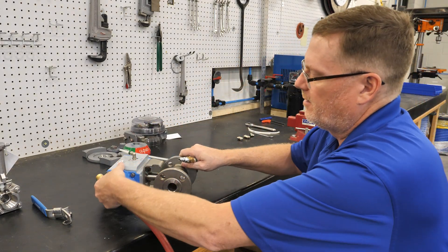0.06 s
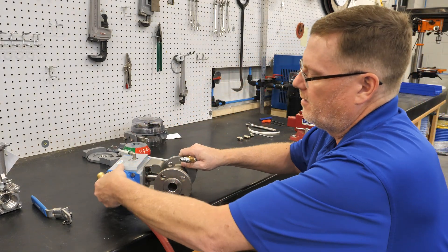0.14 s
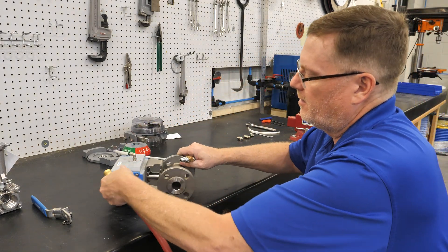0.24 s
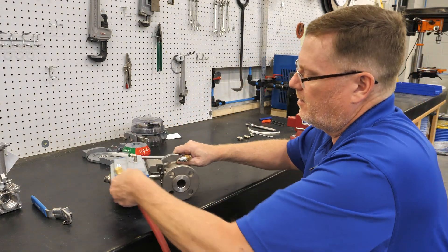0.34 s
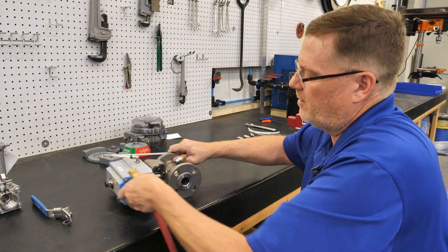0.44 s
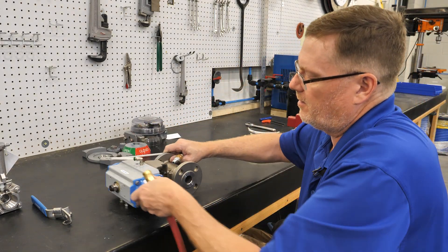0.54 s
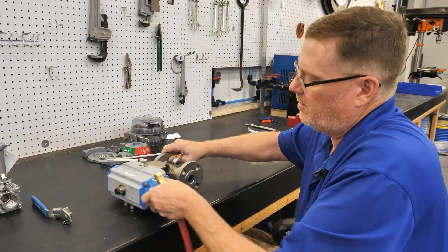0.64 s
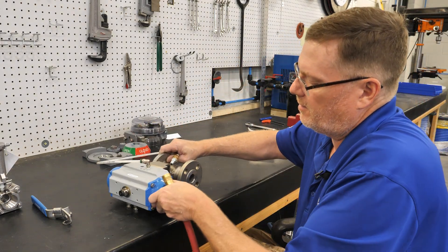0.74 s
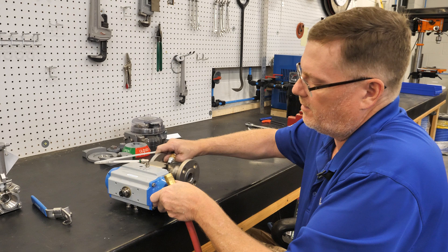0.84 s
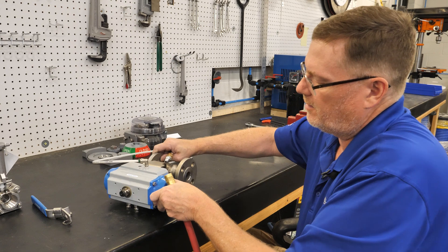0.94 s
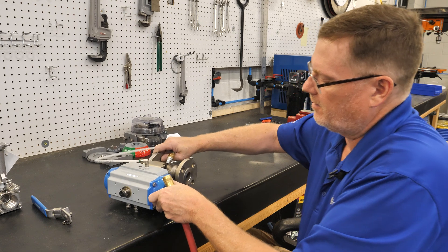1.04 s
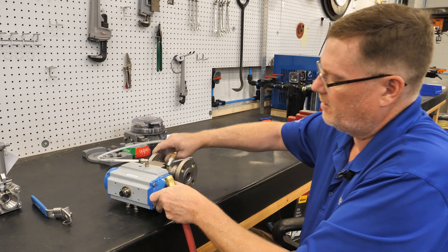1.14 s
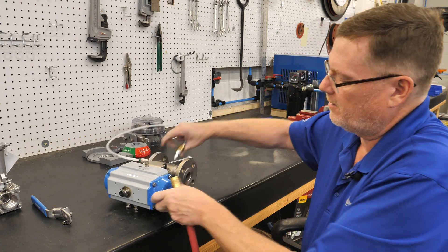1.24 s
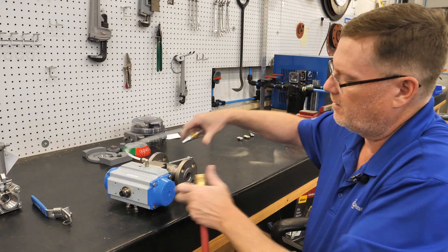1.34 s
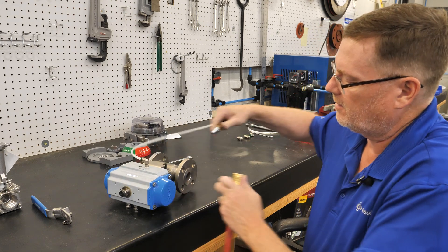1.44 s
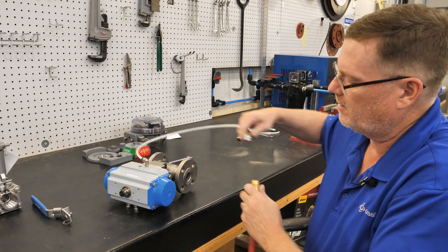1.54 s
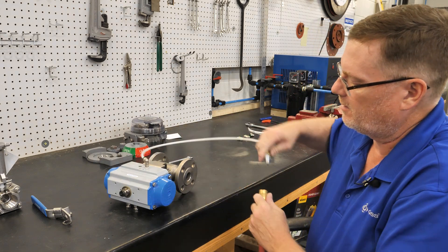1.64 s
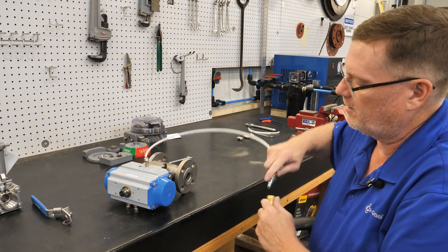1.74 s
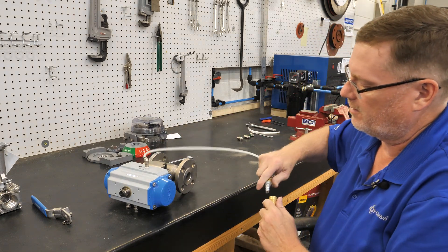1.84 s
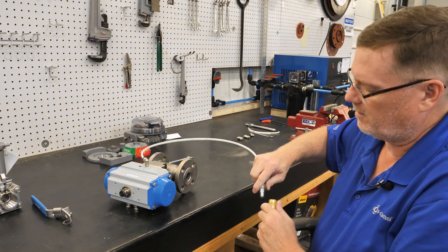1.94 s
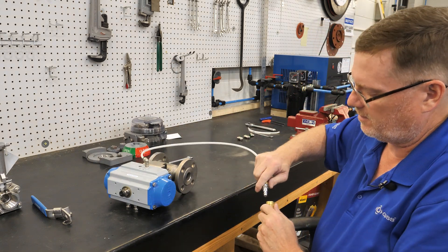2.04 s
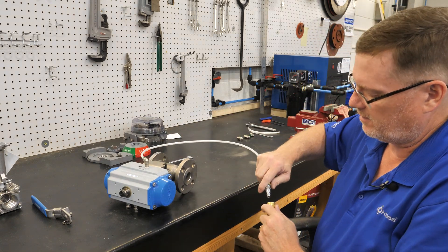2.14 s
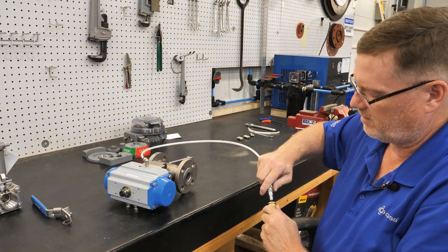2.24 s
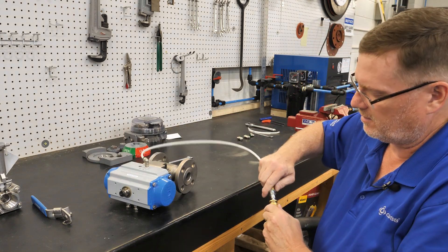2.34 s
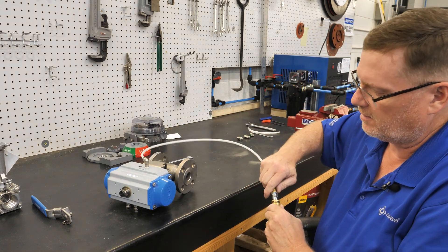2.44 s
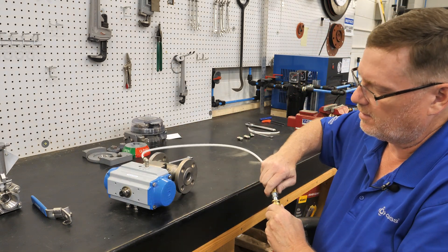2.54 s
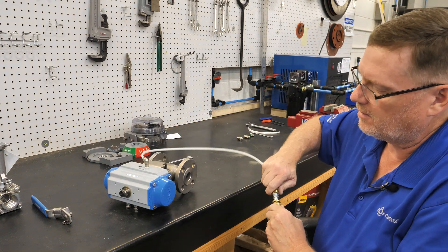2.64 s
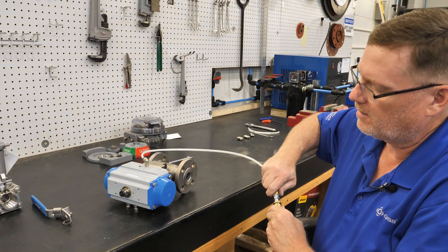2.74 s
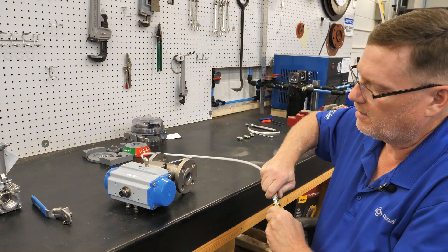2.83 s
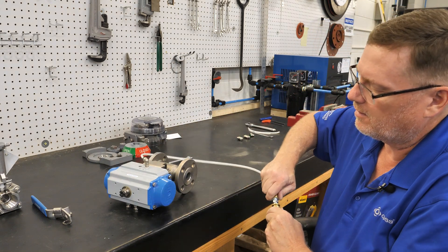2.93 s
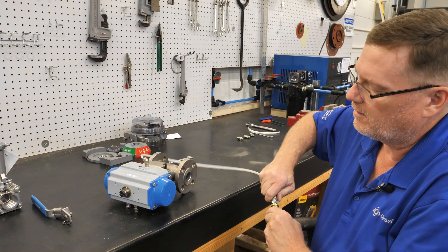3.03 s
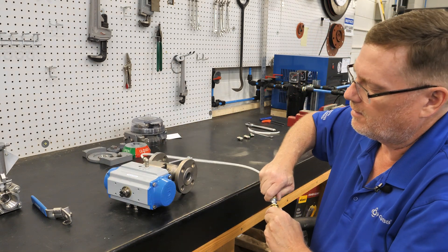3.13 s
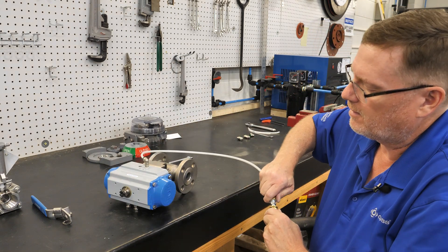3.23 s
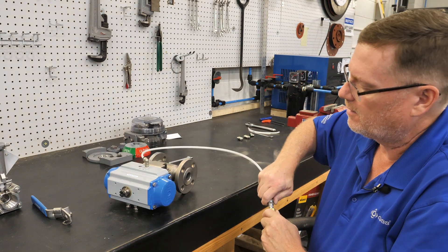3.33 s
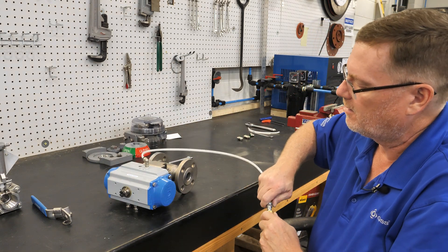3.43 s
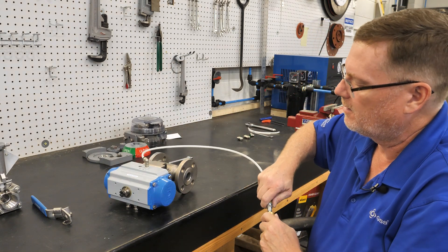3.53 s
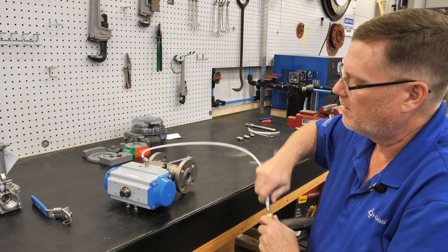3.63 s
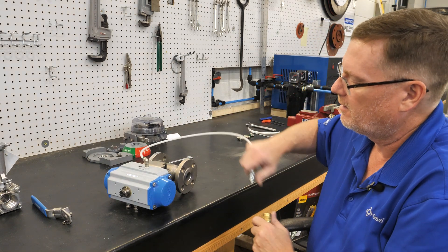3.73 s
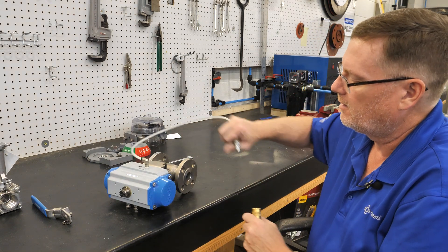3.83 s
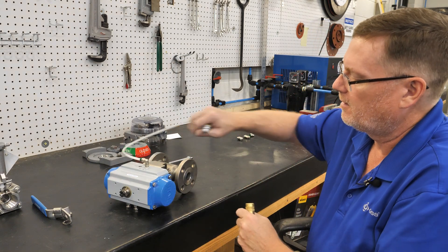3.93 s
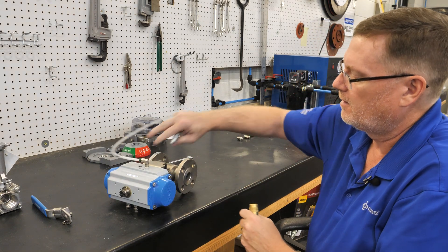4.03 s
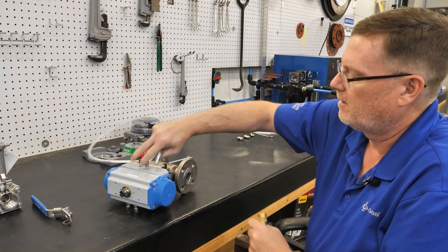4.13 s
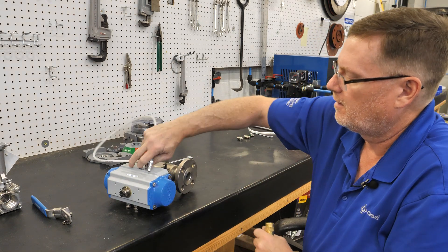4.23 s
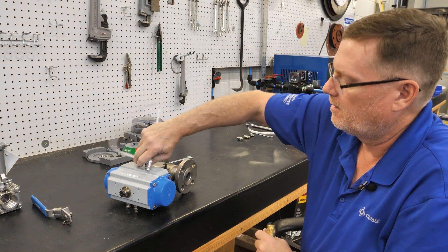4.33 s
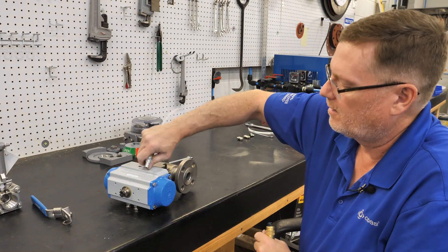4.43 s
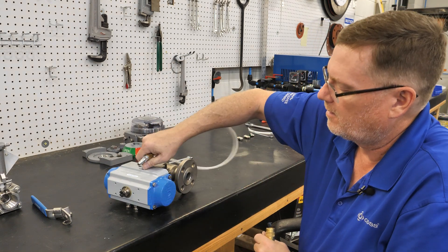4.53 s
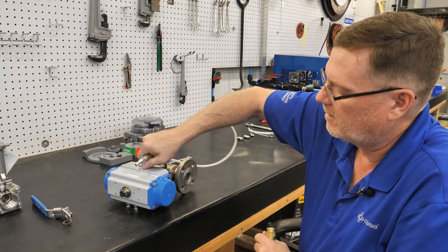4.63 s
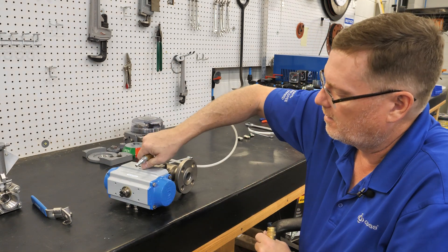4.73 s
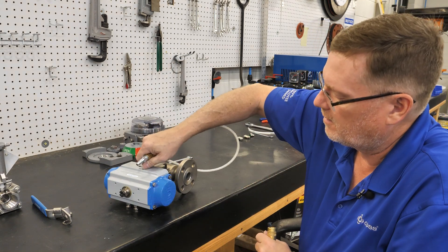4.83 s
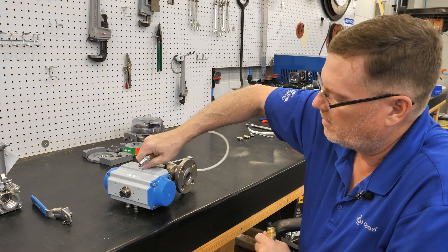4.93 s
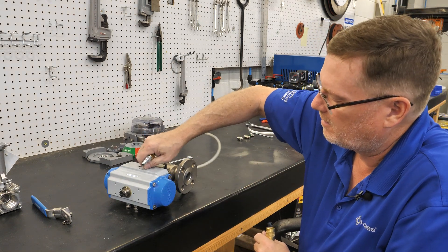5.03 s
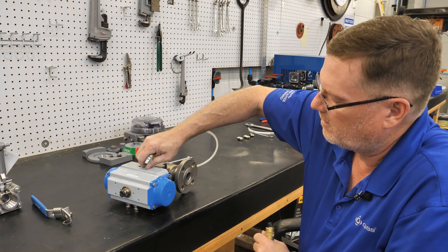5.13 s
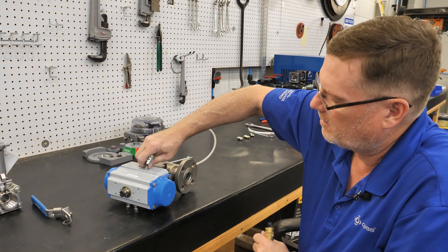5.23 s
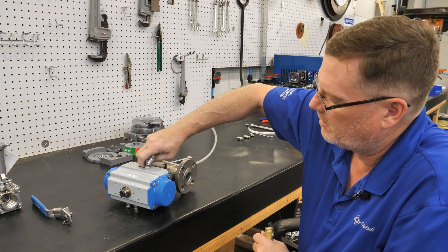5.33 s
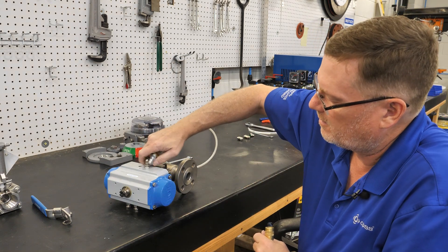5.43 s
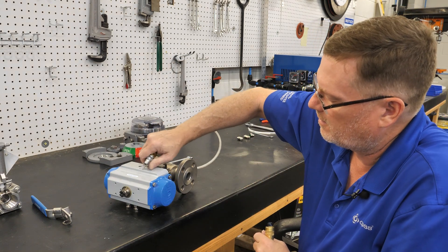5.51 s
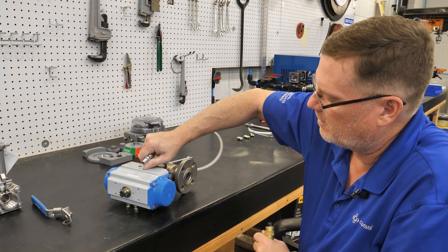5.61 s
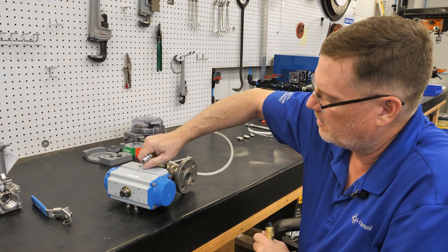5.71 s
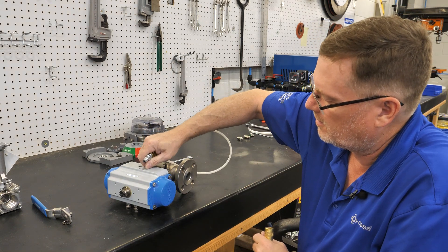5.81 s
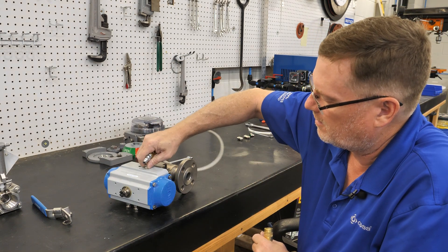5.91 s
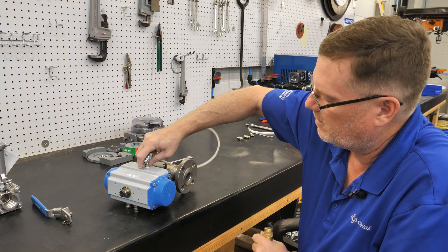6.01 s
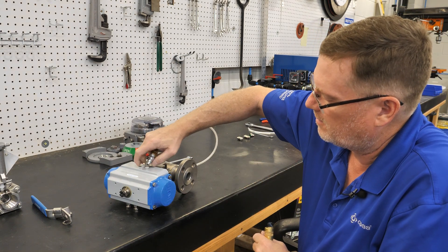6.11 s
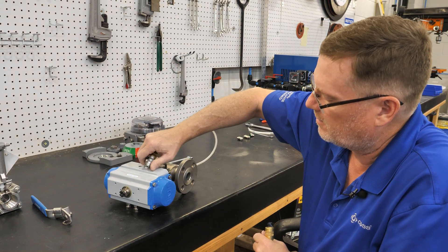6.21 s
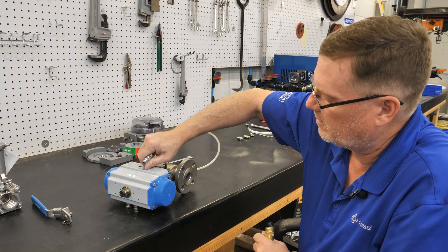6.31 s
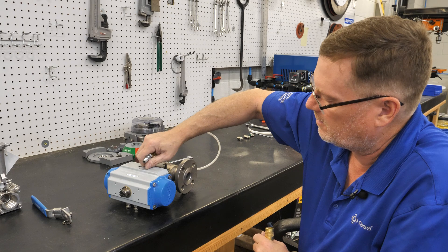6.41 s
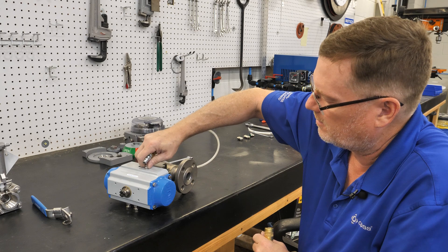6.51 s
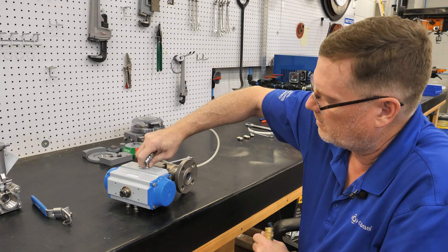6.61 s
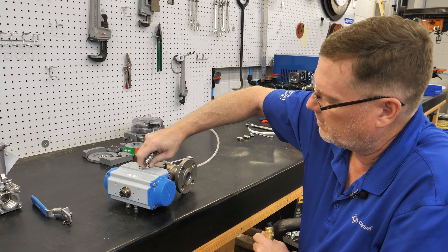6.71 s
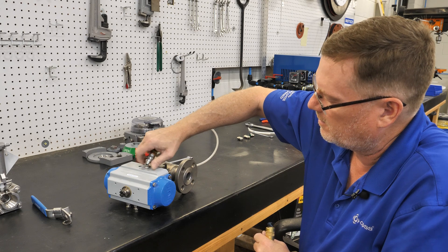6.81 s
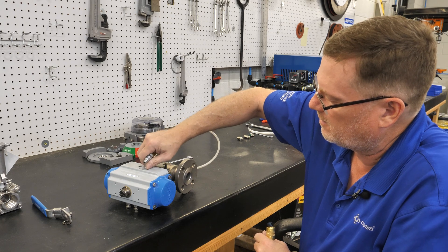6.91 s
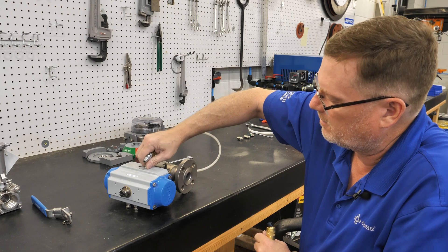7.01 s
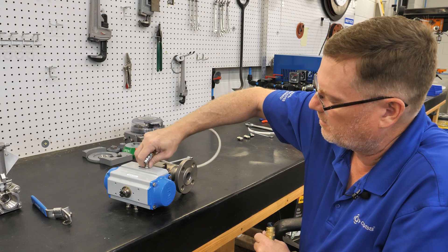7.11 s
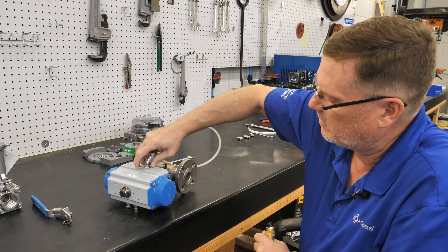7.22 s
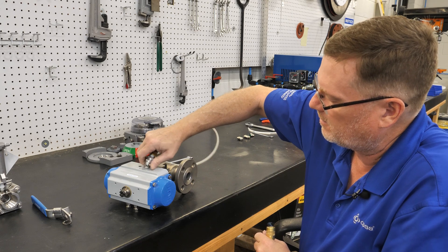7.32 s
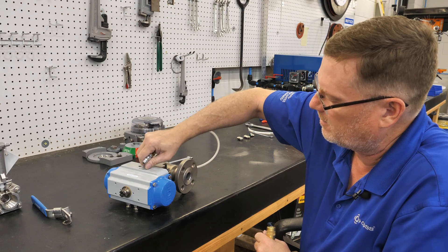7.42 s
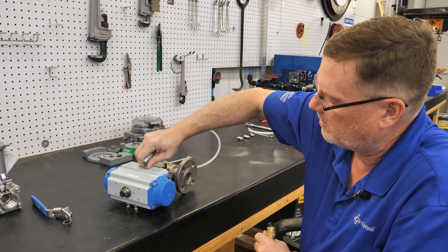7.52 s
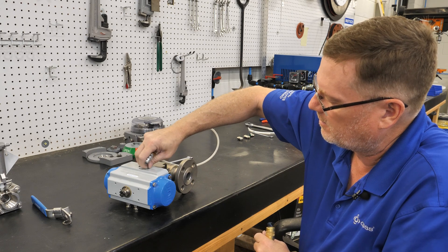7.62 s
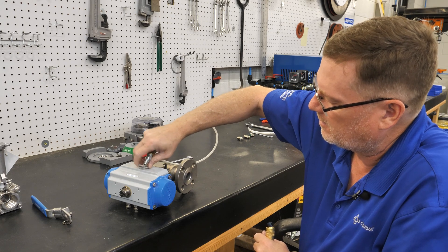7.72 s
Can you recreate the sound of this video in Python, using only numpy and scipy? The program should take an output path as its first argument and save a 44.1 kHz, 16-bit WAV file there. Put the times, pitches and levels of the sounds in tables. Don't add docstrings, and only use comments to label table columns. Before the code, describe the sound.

Close collar microphone in a softly humming workshop. A heavy metal actuator is dragged over a bench in stuttering slips with a brief rubber squeak, then set down with low thuds. A hose creaks and a brass coupler clicks. Two loud, rough blasts of compressed air hiss and buffet the microphone, the second fading away. A plug chinks brightly on aluminium, then sparse tiny thread ticks follow.

```python
import sys
import numpy as np
from scipy import signal
from scipy.fft import rfft, irfft
from scipy.io import wavfile
from scipy.ndimage import uniform_filter1d, map_coordinates

SR = 44100
rng = np.random.default_rng(int(sys.argv[2]) if len(sys.argv) > 2 else 0)


def master(y):
    cut = np.clip(np.atleast_2d(y).T, -1, 1)
    pcm = np.round(cut * 32767)
    wavfile.write(sys.argv[1], SR, pcm.astype(np.int16))


def how_loud(loudness_db):
    steps = np.asarray(loudness_db, float) / 20
    return 10 ** steps


N = 342216

QUIET_TOP_HZ = 12850

# (time [s], peak level [dB])
CHINK = [
    (4.5868, -36.5),
    (4.5902, -37.5),
]


def unit(x):
    return x / np.sqrt(np.mean(np.abs(x) ** 2) + 1e-20)


def along(points, hz):
    f, value = np.transpose(points)
    return np.interp(np.log(hz + 1), np.log(f + 1), value)


def curves(tables, t):
    s, *columns = np.concatenate(tables).T
    return [np.interp(t, s, column) for column in columns]


def wobble(rate):
    points = rng.standard_normal(int(N * rate / SR) + 4)
    return map_coordinates(points, [np.arange(N) * rate / SR])


def hump(hz, centre_hz, width_hz):
    return 1 / (1 + ((hz * hz - centre_hz ** 2) / (hz * width_hz + 1)) ** 2)


def between(hz, lo_hz, hi_hz):
    low_side = 1 + (lo_hz / (hz + 1)) ** 12
    high_side = 1 + (hz / hi_hz) ** 16
    return 1 / low_side / high_side


def shaped(power, patchy_db, size):
    hz, t, z = signal.stft(rng.standard_normal(N), SR, nperseg=size)
    patches = uniform_filter1d(rng.standard_normal(z.shape), 5, 0)
    patches = uniform_filter1d(patches, 6, 1)
    shape = power(hz[:, None], t) + 0 * t
    gain = np.sqrt(shape / shape.mean(0)) * how_loud(patchy_db * unit(patches))
    return signal.istft(z * gain, SR, nperseg=size)[1][:N]


def add(track, s, hz, db, t60, attack, width_hz=0):
    t = np.arange(int(min(t60, .9) * SR)) / SR
    carrier = np.exp(2j * np.pi * hz * t)
    if width_hz:
        pole = np.exp(-1.5 * np.pi * width_hz / SR)
        noise = [1, 1j] @ rng.standard_normal((2, 4096))
        drift = signal.lfilter([1], [1, -2 * pole, pole ** 2], noise)
        carrier = carrier * unit(np.resize(drift[500:], len(t)))
    envelope = how_loud(db - 60 * t / t60) * (1 - np.exp(-t / attack))
    track[round(s * SR):][:len(t)] += envelope * carrier.imag


def strokes(rows):
    t = np.arange(N) / SR
    gain = np.zeros(N)
    for s, db, swell, fade in rows:
        gain += how_loud(db - np.where(t < s, (s - t) * swell, (t - s) * fade))
    return gain


def tick(track, s, hz, db, case_db, top_db, knock_db):
    add(track, s, hz, db - 16, t60=0.055, attack=0.00026, width_hz=630)
    add(track, s, hz, db - 7.5, t60=0.018, attack=0.0002)
    add(track, s, 5500, db - 4, t60=0.014, attack=0.00032, width_hz=3000)
    add(track, s, 12500, db + top_db - 3.5, t60=0.017, attack=.0004, width_hz=4500)
    add(track, s, 2000, db + case_db, t60=0.033, attack=.0008, width_hz=1000)
    add(track, s, 680, db + knock_db + 0.5, t60=0.058, attack=0.0015)


def shop():
    # (frequency [Hz], level [dB per Hz])
    fans = [(20, -17), (59, -5), (150, -14), (300, -15), (1500, -23.5), (3000, -32.5), (6900, -42.5),
            (13000, -43)]
    # (frequency [Hz], rms level [dB])
    mains = [(59.5, -75), (119, -80.5), (178, -77), (392, -80)]
    # (frequency [Hz], width [Hz], level [dB])
    lamps = [(9800, 140, -99), (10900, 180, -100)]
    t = np.arange(N) / SR
    rush = shaped(lambda hz, s: how_loud(2 * along(fans, hz)) * (hz < QUIET_TOP_HZ), patchy_db=2.0, size=2048)
    out = how_loud(-68.14) * unit(rush)
    for tone_hz, db in mains:
        loudness = how_loud(db + 2.0 + 1.3 * wobble(7))
        out += loudness * np.sin(2 * np.pi * tone_hz * t + 1.4 * wobble(34))
    for centre, width, db in lamps:
        out += how_loud(db) * shaped(lambda hz, s: hump(hz, centre, width) ** 2, patchy_db=0.5, size=2048)
    return out


def drag():
    # (time [s], peak level [dB], grit [dB], lean toward upper modes [dB])
    slips = [(0.001, -46, -16, 0), (0.012, -46, -20, 2), (0.018, -43, -15, 1), (.051, -46, -18, -2),
             (0.056, -38, -18, -1.5), (0.068, -46.5, -16, 1), (0.085, -51, -26, 2), (.151, -52, -20, 0),
             (0.156, -39.5, -18, 1), (0.179, -41, -20, -5), (0.19, -48, -25, 1), (.203, -52, -25, 2),
             (0.219, -45, -18, 2), (0.282, -50, -22, -1), (.289, -51, -22, 3), (0.3, -40, -25, 0),
             (0.321, -45.5, -25, 1), (0.335, -45.5, -21, -6), (0.356, -51, -14, 2), (0.376, -49, -19, 5),
             (0.42, -43, -19, 4.5), (0.434, -50, -24, 0)]
    # (frequency [Hz], level [dB], 60 dB decay [s])
    body = [(357, -5.5, 0.031), (677, 8.5, 0.024), (838, 4, 0.047), (921, -1, 0.055), (1066, -11, 0.078),
            (1384, -16, 0.083), (2450, -29, .06), (3000, -27, .05), (3650, -26, 0.047),
            (5000, -29.5, 0.062)]
    track = np.zeros(N + SR)
    for s, db, grit_db, lean_db in slips:
        for hz, level_db, t60 in body:
            chance_db = 1.4 * rng.standard_normal()
            tilt_db = lean_db * np.tanh(4 * np.log2(hz / 790))
            add(track, s, hz, db + level_db - 2.5 + chance_db + tilt_db, t60, attack=0.0028)
        add(track, s, 4200, db + grit_db, t60=0.025, attack=0.0004, width_hz=2300)
        add(track, s, 10800, db + grit_db - 9, t60=0.026, attack=0.00074, width_hz=1200)
    return track[:N]


def rubbing():
    # (frequency [Hz], width [Hz], level [dB])
    wood = [(337, 29, -6.5), (670, 92, -2.5), (848.4, 76, -5), (1356, 52.6, -12.5)]
    # (peak time [s], peak level [dB], swell [dB/s], fade [dB/s])
    on_top = [(.01, -60.5, 198, 82), (.328, -60.5, 79, 102), (.506, -74, 80, 114), (1.664, -68.5, 110, 200),
              (1.754, -62.5, 252, 53), (2.25, -75, 90, 300), (2.41, -70.5, 149, 40)]
    in_frame = [(.01, -61.5, 200, 150), (.65, -68, 100, 60), (.828, -58, 400, 150), (1.11, -59, 300, 60),
                (1.3, -60.5, 50, 120), (2.02, -71.5, 40, 200), (2.33, -75, 60, 60)]
    of_tube = [(1.35, -66, 62, 199)]
    colour = lambda hz, s: sum(how_loud(2 * db) * hump(hz, c, w) for c, w, db in wood)
    rub = shaped(colour, patchy_db=1.2, size=1024)
    rumble = shaped(lambda hz, s: hump(hz, 140, 75) ** 3, patchy_db=2.5, size=2048)
    swish = shaped(lambda hz, s: hump(hz, 1000, 620) ** 2, patchy_db=1.5, size=1024)
    return strokes(on_top) * rub + strokes(in_frame) * rumble + strokes(of_tube) * swish


def shirt():
    # (peak time [s], peak level [dB], swell [dB/s], fade [dB/s])
    rustles = [(.01, -77, 100, 85), (.19, -82, 320, 900), (.35, -85.5, 24, 10), (.77, -90, 22, 300),
               (1.16, -87.5, 80, 30), (1.52, -87, 130, 200), (1.77, -84, 43, 20)]
    colour = lambda hz, s: between(hz, 3000, 13000) + 0.82 * hump(hz, 10000, 900)
    weave = shaped(colour, patchy_db=3.0, size=512)
    clumps = unit(how_loud(4.5 * wobble(44.2)))
    return strokes(rustles) * clumps * weave


def handling():
    # (time [s], peak level [dB], frequency [Hz], case share [dB], top share [dB])
    touches = [(0.1844, -59, 3650, -15, 11.5), (0.687, -55.5, 3720, -10, -16),
               (0.7026, -58, 3560, -22, -21), (1.1655, -46, 5270, -34, -34), (1.271, -60, 6560, -19, -28),
               (1.51, -59, 6540, -20, -20), (4.5032, -51, 4170, -4, 5.5), (4.608, -52, 6220, -3.5, -28)]
    track = np.zeros(N + SR)
    for s, db, hz, case_db, top_db in touches:
        tick(track, s, hz, db, case_db, top_db, knock_db=-14)
    return track[:N]


def squeak():
    # (time [s], frequency [Hz], level [dB])
    glide = [(.228, 1990, -100), (.235, 2620, -66), (.243, 5800, -87), (.25, 5830, -70), (.257, 6300, -76),
             (.268, 8800, -67), (.276, 8850, -65), (.292, 8900, -91)]
    t = np.arange(N) / SR
    hz, db = curves([glide], t)
    turn = 2 * np.pi * np.cumsum(hz) / SR + .5 * wobble(900)
    slipping = (t > glide[0][0]) & (t < glide[-1][0])
    tone = np.sin(turn) + .3 * np.sin(2 * turn) * (hz < 7000)
    return slipping * how_loud(db + 3 * wobble(250)) * tone


def thuds():
    # (time [s], peak level [dB], frequency [Hz], 60 dB decay [s])
    landings = [(.812, -46, 100, 0.11), (0.851, -41, 88.5, 0.1), (1.0768, -33.5, 147, 0.069),
                (1.088, -30.5, 87.5, 0.14), (1.107, -35.5, 67.6, 0.26), (1.218, -44, 73.3, 0.32),
                (4.587, -40.5, 59.2, 0.074)]
    track = np.zeros(N + SR)
    for s, db, hz, t60 in landings:
        add(track, s, hz, db - 3.0, t60, attack=0.0005)
        add(track, s, 400, db - 24, t60=0.034, attack=0.0013, width_hz=610)
    return track[:N]


def hose():
    # (time [s], peak level [dB])
    creaks = [(1.074, -59), (1.168, -64), (1.537, -60), (1.567, -56.5), (1.642, -57), (1.731, -49),
              (1.754, -51), (1.795, -51), (1.82, -47), (1.844, -51), (1.874, -46.5), (1.893, -52),
              (1.943, -48), (2.133, -45), (2.17, -52.5), (2.201, -51), (2.23, -52), (2.416, -46),
              (2.4204, -45), (2.472, -45), (2.491, -47.5)]
    track = np.zeros(N + SR)
    for s, db in creaks:
        bend, rough = rng.standard_normal(2)
        hz = 644.6 * (1 + 0.0091 * bend)
        add(track, s, hz, db + 2.0, t60=0.039, attack=0.002)
        add(track, s, 1.27 * hz, db - 7.5, t60=.04, attack=0.0019)
        add(track, s, 2000, db - 12 + 3 * rough, t60=.02, attack=.001, width_hz=2500)
    return track[:N]


def ringing_parts():
    # (time [s], frequency [Hz], level [dB], 60 dB decay [s])
    rings = [(1.1655, 7757, -52, .025), (1.1655, 6212, -59, .06), (1.1655, 1534, -57, .035),
             (1.271, 6700, -70, .09), (4.5032, 15340, -54, .012), (4.5032, 6000, -66, .045),
             (4.5032, 1960, -62, .03), (4.581, 6220, -67, .05), (4.581, 5550, -68, .05),
             (5.3619, 5050, -78, .3), (5.366, 7200, -66, .02), (6.047, 1950, -62, .03),
             (6.076, 1950, -67, .03)]
    track = np.zeros(N + SR)
    for s, hz, db, t60 in rings:
        add(track, s, hz, db, t60, attack=.0005)
    return track[:N]


def coupler():
    # (time [s], peak level [dB], frequency [Hz], low share [dB], top share [dB])
    clicks = [(2.3485, -55.5, 7600, -25.5, 6), (2.351, -52.5, 7735, 4.5, -20), (2.3611, -54, 7750, -28, 2),
              (2.386, -37.5, 7270, -17, -26), (2.4153, -45, 7300, -7, -31), (2.4373, -60, 7200, -8, -20),
              (2.4428, -54, 7940, -7.5, -13.5), (2.4713, -39.5, 8300, -8, -24),
              (2.4735, -50, 7400, -12, -20), (2.4755, -35.5, 7570, -13.5, -21),
              (2.481, -51, 7620, -8.5, -20), (2.4964, -57, 8600, -21, -14.5)]
    # (share of click frequency, level [dB], 60 dB decay [s])
    sleeve = [(1, -1, .017), (1.057, -6, .015), (1.2, -13, .012), (1.43, -16, .014)]
    # (frequency [Hz], width [Hz], level [dB])
    scrape_bands = [(7690, 1300, 0), (10630, 900, -10), (2850, 400, -7.5)]
    # (peak time [s], peak level [dB], swell [dB/s], fade [dB/s])
    slides = [(2.345, -81, 500, 300), (2.4, -75, 300, 300), (2.44, -73, 300, 300), (2.47, -63, 1200, 350)]
    track = np.zeros(N + SR)
    for s, db, hz, low_db, top_db in clicks:
        longer = 1 + (db + 40) / 30
        for share, ring_db, t60 in sleeve:
            add(track, s, share * hz, db + ring_db, t60 * longer, attack=.0001)
        add(track, s, 8500, db - 9, t60=0.006, attack=.0001, width_hz=6000)
        add(track, s, 3500, db + low_db, t60=0.014, attack=0.0002, width_hz=1900)
        add(track, s, 13000, db + top_db, t60=.008, attack=.0002)
    add(track, 2.4712, 2850, -51, t60=0.05, attack=.0002)
    colour = lambda hz, s: sum(how_loud(2 * db) * hump(hz, c, w) ** 2 for c, w, db in scrape_bands)
    return track[:N] + strokes(slides) * shaped(colour, patchy_db=3, size=256)


def band_gain(hz, s):
    # (start [s], end [s], pitch slide [share]); a row that ends before it starts is silent
    spans = [(2.8, 2.895, 0.0025), (2.92, 2.978, -0.082), (2.96, 3.302, 0.062), (3.02, 3.045, -0.053),
             (3.293, 3.625, -0.072), (3.535, 3.7, 0.12), (3.68, 3.705, -0.088), (3.685, 3.79, -.17),
             (3.79, 3.895, .01), (3.64, 3.7, -.03), (3.74, 3.746, 0.0051), (3.684, 3.9, -0.085),
             (3.735, 4.092, -0.031), (2.96, 3.035, -0.091), (3.7, 3.61, -0.064), (3.8, 3.665, -.03),
             (3.83, 3.905, -.07), (2.925, 3.3, -.1), (3.735, 3.795, .05), (3.61, 3.71, .01),
             (3.09, 3.275, .01), (2.975, 3.05, .01), (2.76, 2.83, .01), (2.895, 2.945, .01)]
    # (frequency [Hz], width [Hz], level [dB])
    span_bands = [
        [(1390, 1500, 2), (5670, 1100, 5), (8300, 2000, 7.5), (14325, 1500, 6.5)],
        [(400, 270, 3.5), (9374, 1500, 5), (11400, 2000, 3.5)],
        [(5500, 5000, 10.5), (7750, 700, 4.5), (9990, 2900, 2.5)],
        [(4440, 1600, 5), (6140, 900, 4), (7850, 900, 5), (13500, 2000, 6)],
        [(400, 110, 3.5), (810, 470, 1), (8000, 2600, 3)],
        [(2960, 1190, 6.5), (9400, 900, 3)],
        [(12600, 900, 9)],
        [(12200, 1300, 12.5)],
        [(11300, 1500, 7.5), (15400, 1000, 11)],
        [(4700, 1100, 5), (9450, 1200, 6)],
        [(2500, 900, 11), (4600, 2200, 11.5), (800, 1200, 3), (14500, 3000, 10.5)],
        [(7850, 1900, 19)],
        [(1100, 800, 6), (3800, 1000, 9.5), (8900, 2700, 6.5)],
        [(750, 700, 11)],
        [(7600, 800, 3.5)],
        [(3150, 450, 5)],
        [(8100, 350, 9)],
        [(80, 70, 9)],
        [(3450, 800, 6)],
        [(15000, 2500, -5)],
        [(14000, 5000, -5)],
        [(6900, 500, -4), (2100, 900, -3)],
        [(8300, 2000, 3), (150, 250, -10)],
        [(9000, 1200, 3), (3000, 1500, 3)],
    ]
    gain = np.ones((len(hz), len(s)))
    for (s0, s1, slide), sounded in zip(spans, span_bands):
        on = (s > s0) & (s < s1)
        sounding = np.clip(np.minimum(s[on] - s0, s1 - s[on]) / 0.0086, 0, 1)
        for band_hz, width_hz, db in sounded:
            centre = band_hz * (1 + slide * (s[on] - s0) / (s1 - s0))
            boost = how_loud(2 * db * sounding) - 1
            gain[:, on] *= 1 + boost * hump(hz, centre, width_hz) ** 2.2
    return gain


def jet():
    # (time [s], flow [dB], aim at the collar [dB], sharpness of the gap [dB])
    leak = [
        (2.766, -68, 0, -3.5),
        (2.778, -36, -12.5, 0),
        (2.786, -26, -16, -1),
        (2.802, -22, -14.5, -3.5),
        (2.85, -20.5, -11, -3),
        (2.905, -20.5, -10.5, -2.5),
        (2.94, -17, -5, -4),
        (2.968, -17, -6.5, -3),
        (2.978, -30, -4, -4.5),
    ]
    seat = [
        (2.982, -26, -12.5, -14),
        (2.99, -24.5, -18.5, -11.5),
        (3.014, -18, -13, -13.5),
        (3.04, -28.5, -14, -13.5),
        (3.076, -41.5, -9.5, -13.5),
        (3.16, -46, -9.5, -15),
        (3.262, -53.5, -4.5, -19.5),
        (3.285, -51.5, -8.5, -10),
    ]
    burst = [
        (3.295, -47.5, -15, 0),
        (3.306, -37.5, -12.5, 0),
        (3.316, -23.5, -2, -1),
        (3.331, -16, -2, -6.5),
        (3.419, -18, -3, -6.5),
        (3.445, -19.5, -7.5, -7),
        (3.513, -22, -8.5, -8),
        (3.565, -19.5, -10.5, -4.5),
        (3.62, -24, -14, -7.5),
    ]
    vent = [
        (3.645, -22, -16.5, -10),
        (3.678, -22.5, -14, -8),
        (3.705, -24.5, -17, -12.5),
        (3.74, -27, -13, -8.5),
        (3.785, -33.5, -15.5, -9.5),
        (3.862, -46.5, -6, -20),
        (3.922, -60, 0.5, -21.5),
        (4.099, -69.5, 1.5, -16.5),
        (4.27, -83, 6.5, -6.5),
    ]
    # (frequency [Hz], level [dB per Hz])
    turbulence = [(25, -5), (110, -0.5), (800, -1.5), (1600, -3), (2300, -10.5), (3200, -30)]
    acts = [leak, seat, burst, vent]
    t = np.arange(N) / SR
    flow_db, aim_db, _ = curves(acts, t)
    opened = np.interp(t, [2.75, 2.765, 4.3, 4.45], [0, 1, 1, 0])

    def thump_colour(hz, s):
        return how_loud(2 * along(turbulence, hz)) * band_gain(hz, s)

    def hiss_colour(hz, s):
        sharp_db = curves(acts, s)[2]
        slope_db = np.maximum(0.68 * (sharp_db + 6.5), -20)
        return between(hz, 2050, 16000) * how_loud(2 * slope_db * np.log2(hz / 7000 + 0.32)) * band_gain(hz, s)

    eddies = how_loud(1.4 * wobble(150) + 2.7 * wobble(1500))
    buffet = unit(eddies * shaped(thump_colour, patchy_db=0.0, size=512))
    hiss = how_loud(0.33 * wobble(300) - 0.53) * shaped(hiss_colour, patchy_db=1.16, size=256)
    return opened * how_loud(flow_db) * (how_loud(aim_db - 2.0) * buffet + hiss)


def chink():
    # (frequency [Hz], level [dB], 60 dB decay [s])
    brass = [(1906, -14.5, 0.13), (5550, -2, 0.08), (5562, -18, 0.27), (5850, -25, .12), (6220, 2.5, 0.2),
             (6200, -21, 0.3), (6810, -6.5, 0.76), (7630, -11, 0.065), (11480, -9, 0.31)]
    track = np.zeros(N + SR)
    for s, db in CHINK:
        add(track, s, 6000, db - 6, t60=.015, attack=.0003, width_hz=12000)
        add(track, s, 1300, db - 12, t60=0.035, attack=0.0004, width_hz=1800)
    s, blow_db = CHINK[0]
    add(track, s, 6222, blow_db - 29, t60=.8, attack=.01, width_hz=55)
    for hz, db, t60 in brass:
        add(track, s, hz, blow_db + db - 5.0, t60, attack=0.00037)
    return track[:N]


def thread():
    # (time [s], peak level [dB], frequency [Hz], case share [dB], knock share [dB])
    ticks = [(5.3619, -50.5, 5110, -11, -13.5), (5.5648, -50.5, 4980, -25.5, -12),
             (5.5844, -58, 4250, -14, -6), (5.5962, -58, 4230, -14, -15), (5.6141, -57, 4090, -21, 1.5),
             (6.0434, -55.5, 5230, -6, -4), (6.047, -47, 5200, -6, -4), (6.066, -62, 5300, -10, -11),
             (6.2108, -54.5, 5800, -21, -4), (6.316, -62, 4240, -13, -8), (6.3244, -56.5, 3660, -7, -20.5),
             (6.3305, -61.5, 4275, 2.5, 3), (6.337, -61.5, 2600, 0, 1), (6.8651, -52.5, 6200, -6.5, -24),
             (6.931, -63, 5000, -8, -15), (6.9464, -64, 3910, -4, -2.5), (7.366, -64, 4300, -15, -15),
             (7.4054, -56, 3892, -25, -6), (7.4294, -63.5, 3541, -11, 6)]
    # (peak time [s], peak level [dB], swell [dB/s], fade [dB/s])
    rattles = [(5.575, -69, 600, 200), (6.32, -81, 500, 500)]
    track = np.zeros(N + SR)
    for s, db, hz, case_db, knock_db in ticks:
        tick(track, s, hz, db, case_db, -41, knock_db)
    rattle = shaped(lambda hz, s: hump(hz, 4140, 1097) ** 2, patchy_db=5, size=256)
    return track[:N] + strokes(rattles) * rattle


def walls(x):
    # (frequency [Hz], 60 dB decay [s])
    decay = [(150, 0.55), (1000, 0.65), (5000, 0.92), (10000, 0.28), (16000, 0.49)]
    hz, t, z = signal.stft(rng.standard_normal(SR), SR, nperseg=256)
    fade = how_loud(-60 * t / along(decay, hz)[:, None])
    tail = signal.istft(z * fade, SR, nperseg=256)[1]
    late = np.pad(x, (600, 0))
    return signal.fftconvolve(late, tail / np.linalg.norm(tail))[:N]


def scene():
    hands = drag() + rubbing() + shirt() + squeak() + thuds() + hose()
    brass = handling() + ringing_parts() + coupler() + chink() + thread()
    air = jet()
    room = walls(how_loud(-23.5) * air + how_loud(-21) * hands + how_loud(-29) * brass)
    return np.tile(shop() + hands + brass + air + room, (2, 1))


def low_pass(x):
    return signal.sosfilt(signal.butter(12, 16510, fs=SR, output="sos"), x)


def record(dry):
    # (start [s], end [s], low edge [Hz], high edge [Hz], level [dB])
    side_bursts = [
        (2.928, 2.974, 7500, 9100, -35),
        (3.392, 3.438, 8200, 11200, -30),
    ]
    t, freqs = np.arange(N) / SR, np.fft.rfftfreq(N, 1 / SR)
    side = how_loud(-90) * shaped(lambda hz, s: between(hz, 2500, QUIET_TOP_HZ), patchy_db=0, size=1024)
    for s0, s1, lo_hz, hi_hz, db in side_bursts:
        band = shaped(lambda hz, s: (hz > lo_hz) * (hz < hi_hz) + 1e-9, patchy_db=0, size=1024)
        side += how_loud(db) * band * np.clip(np.minimum(t - s0, s1 - t) / .02, 0, 1)

    def below(edge_hz):
        return np.cos(np.pi / 2 * np.clip((freqs - edge_hz) / 200 + 1, 0, 1)) ** 2

    spectrum = rfft(dry + side * np.array([[1], [-1]]))
    body = irfft(spectrum * below(QUIET_TOP_HZ), N)
    top = irfft(spectrum * below(15850), N) - body
    loud_enough = uniform_filter1d(top[0] ** 2, size=1024) > how_loud(2 * -93)
    return low_pass(body + top * uniform_filter1d(1. * loud_enough, size=700))


dry = scene()
out = record(dry)
master(out)
```